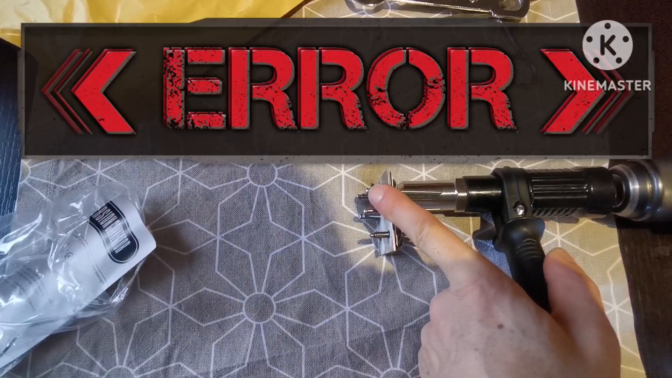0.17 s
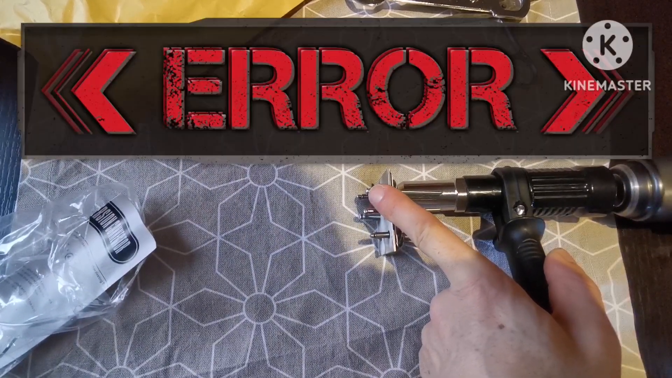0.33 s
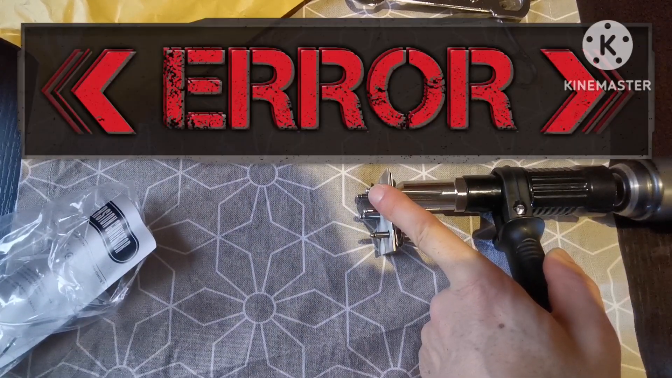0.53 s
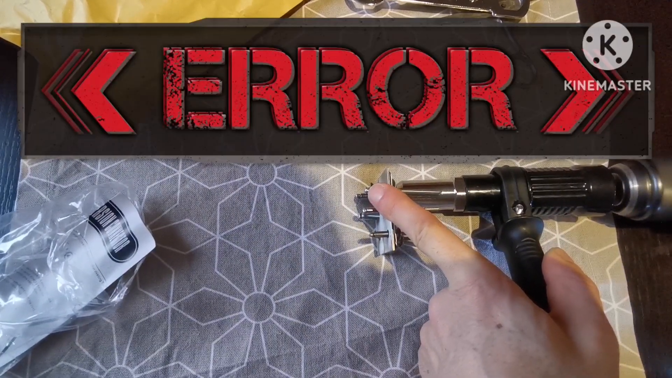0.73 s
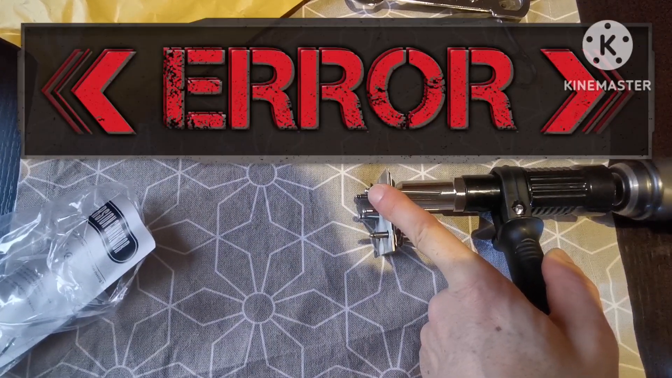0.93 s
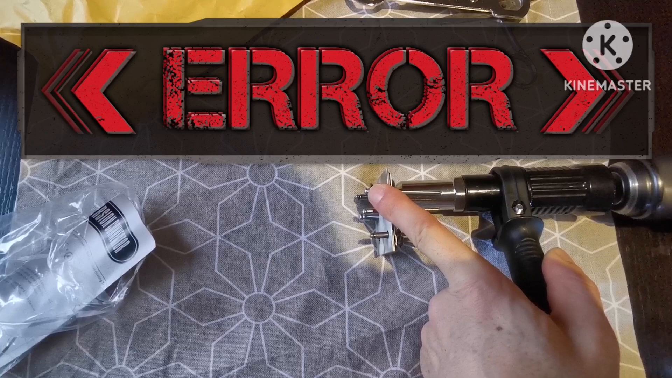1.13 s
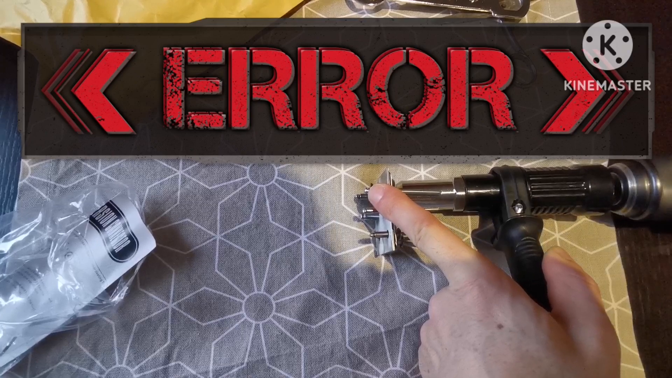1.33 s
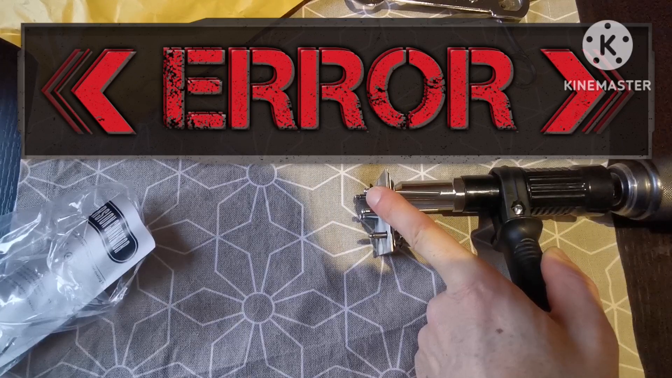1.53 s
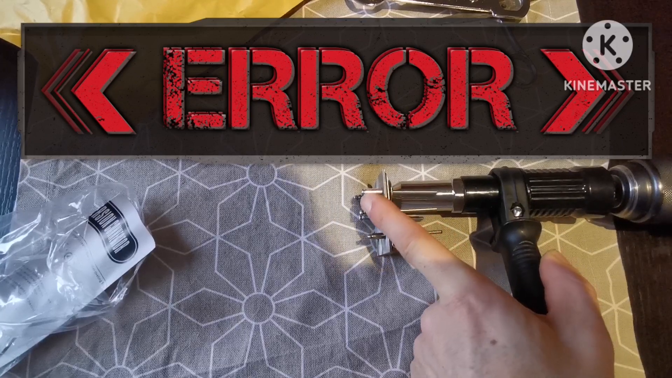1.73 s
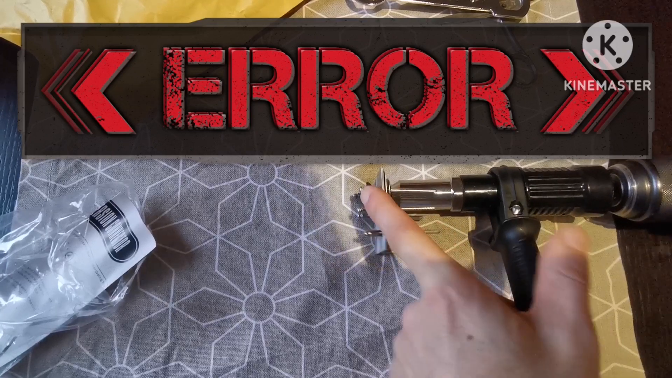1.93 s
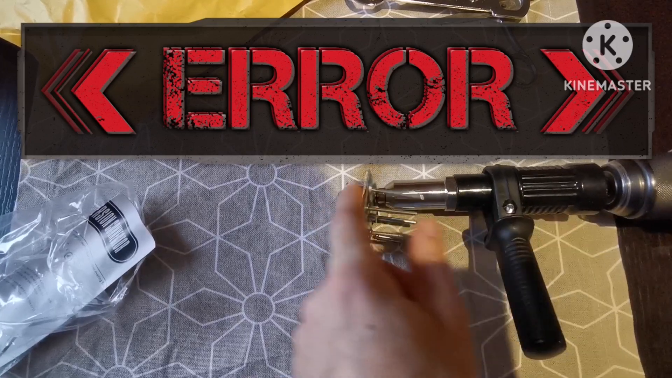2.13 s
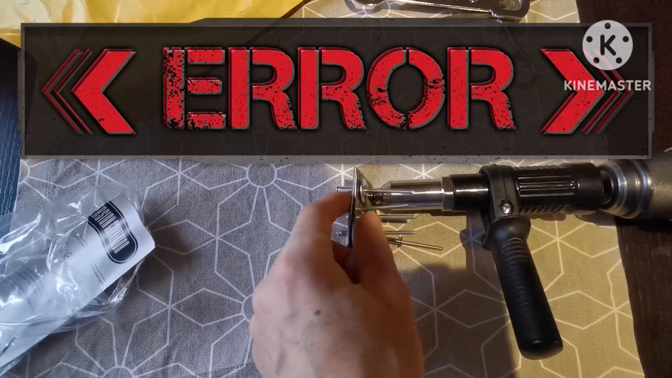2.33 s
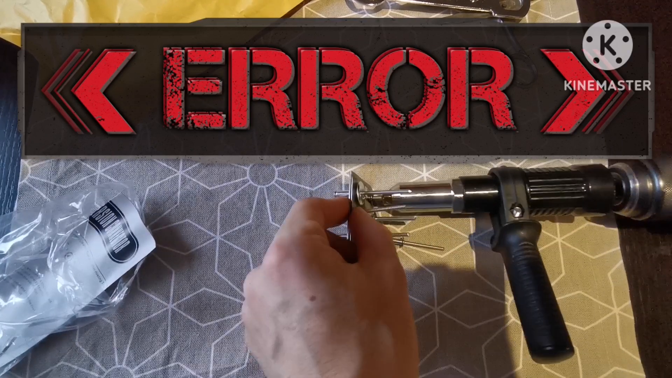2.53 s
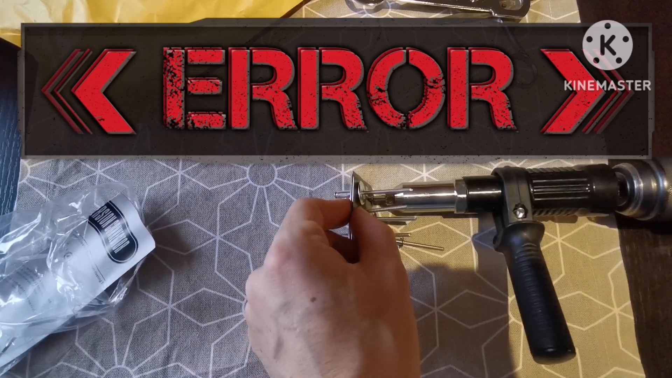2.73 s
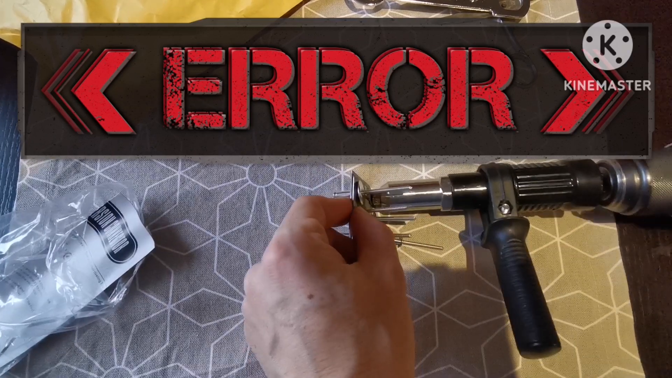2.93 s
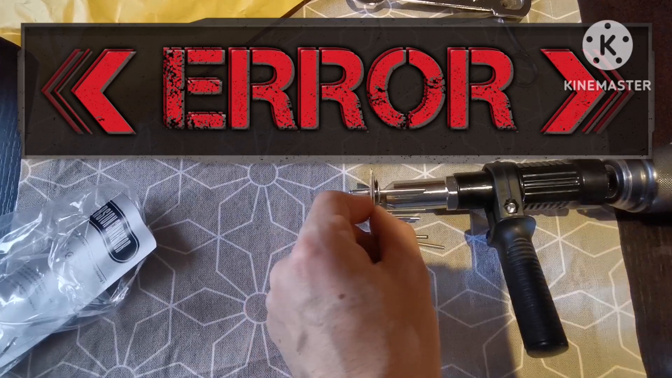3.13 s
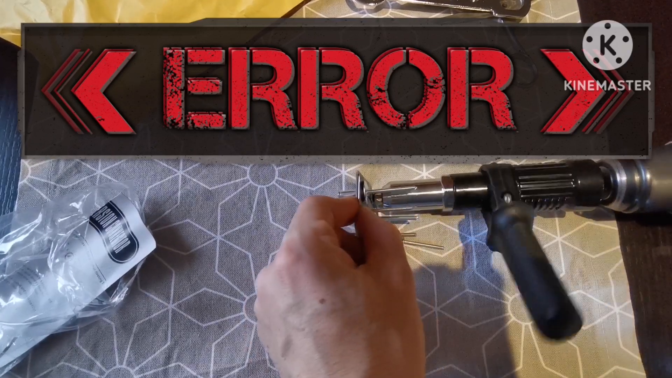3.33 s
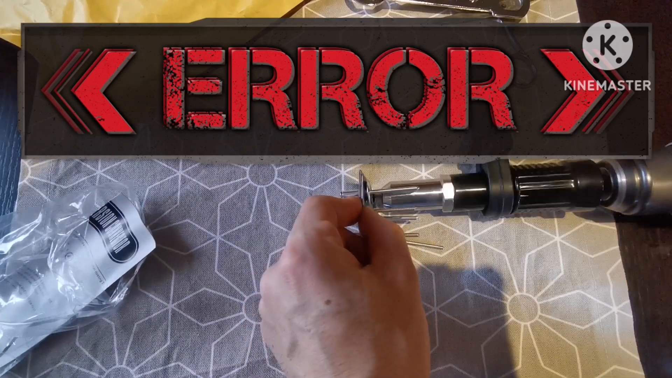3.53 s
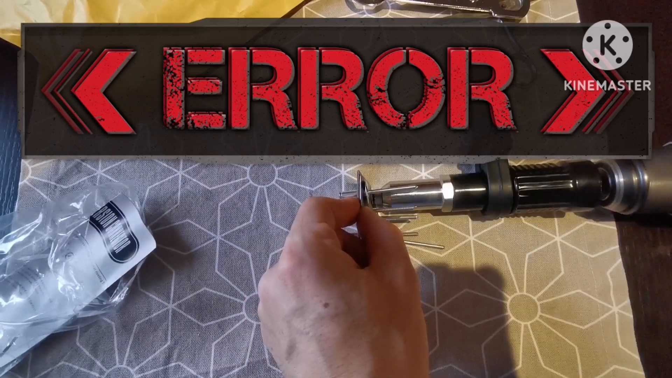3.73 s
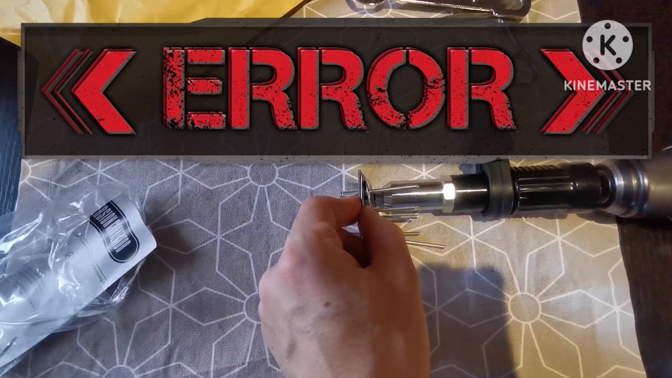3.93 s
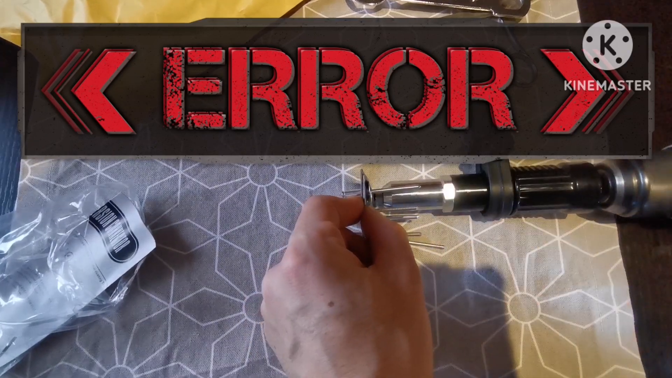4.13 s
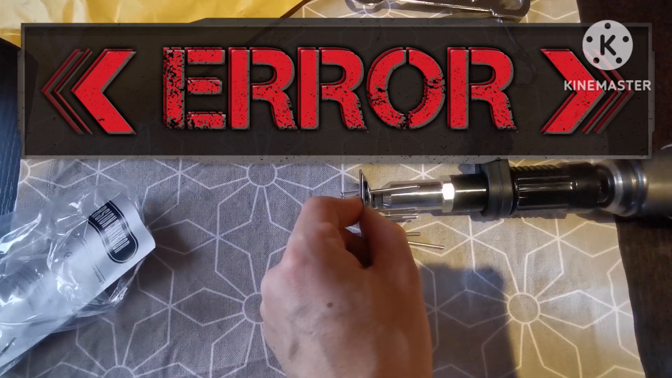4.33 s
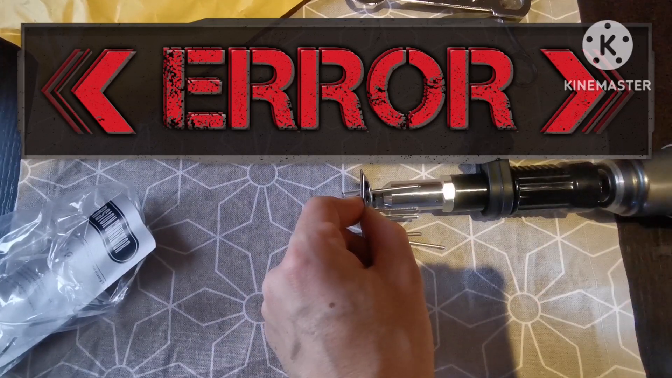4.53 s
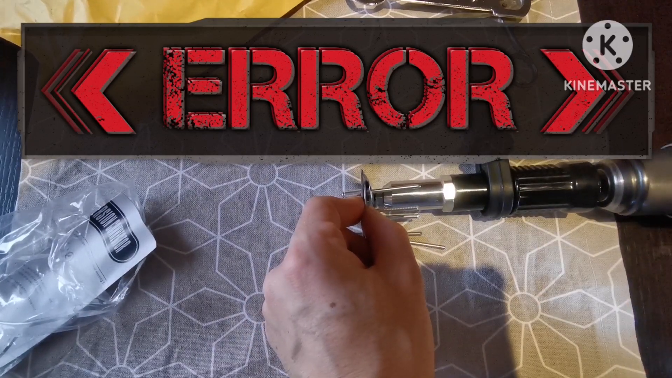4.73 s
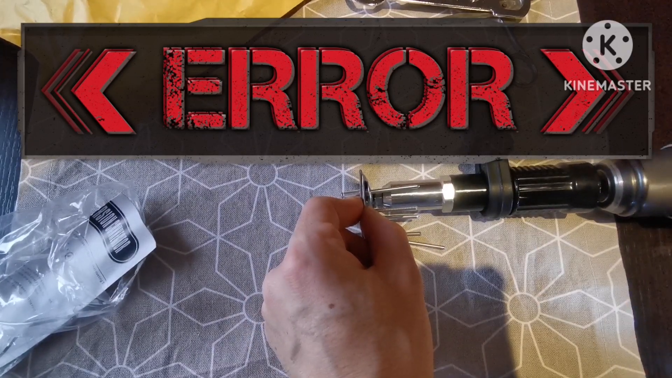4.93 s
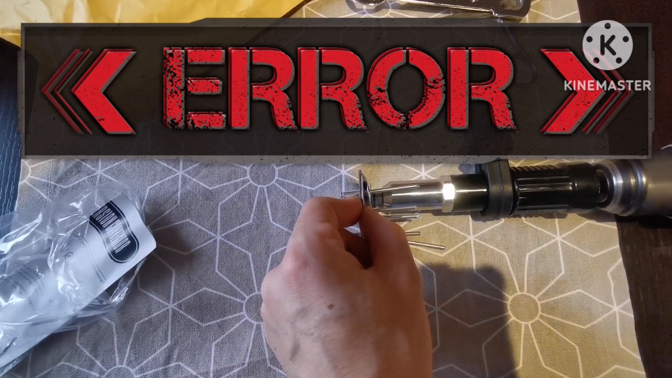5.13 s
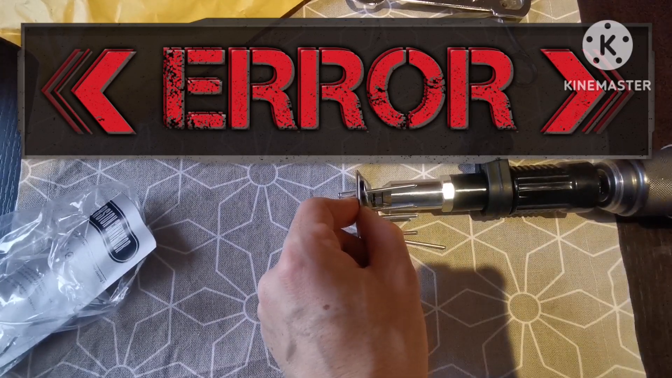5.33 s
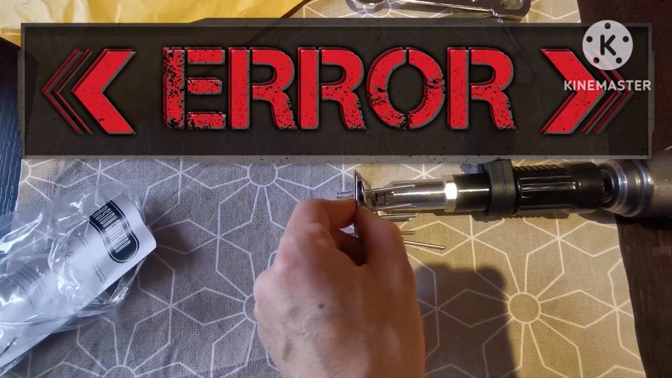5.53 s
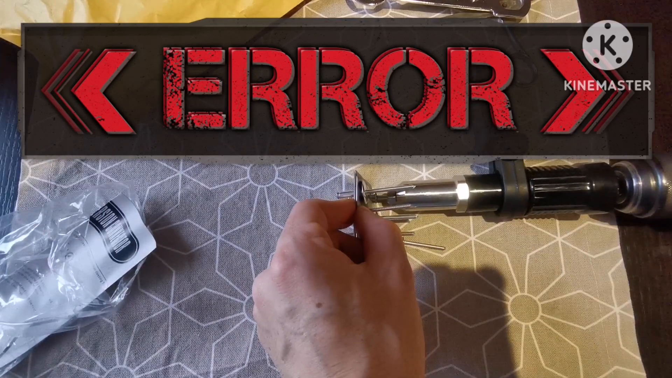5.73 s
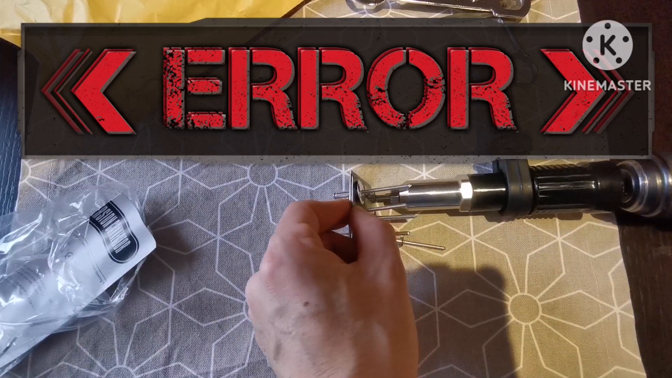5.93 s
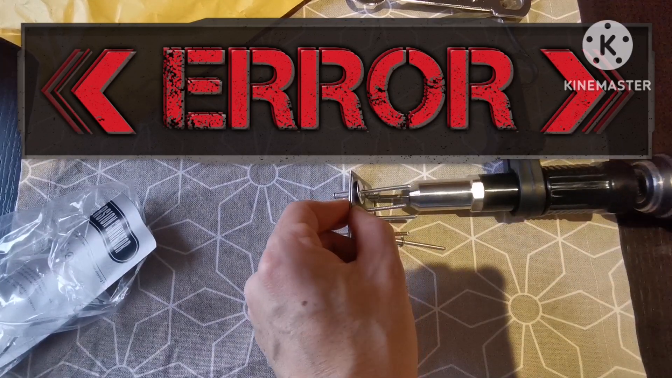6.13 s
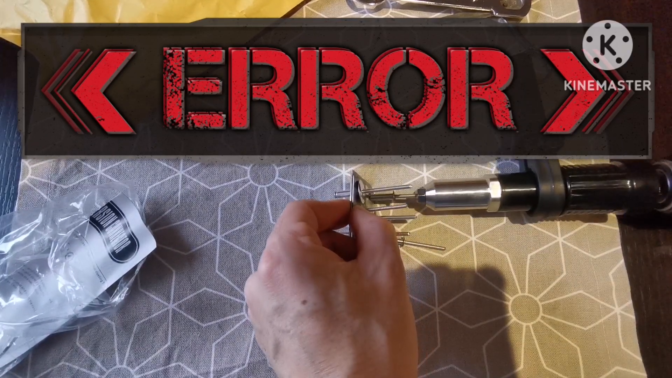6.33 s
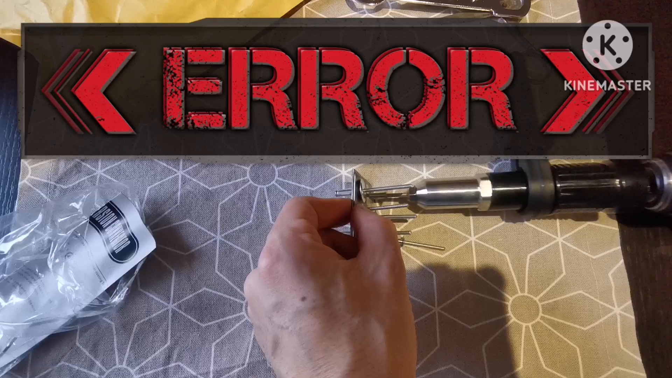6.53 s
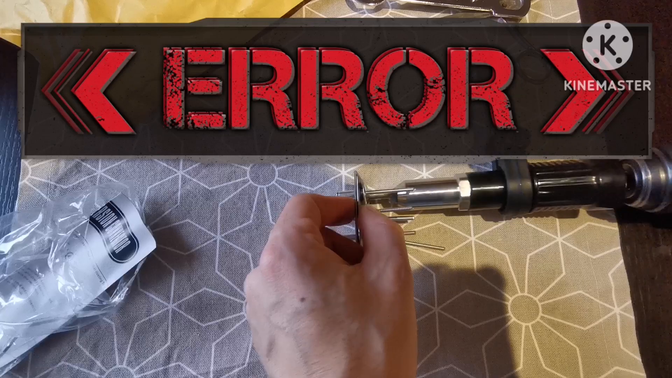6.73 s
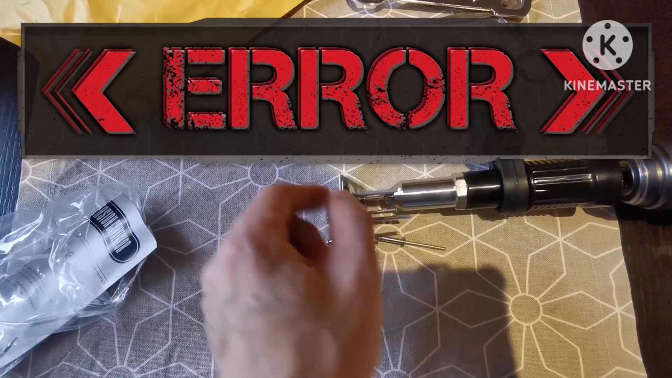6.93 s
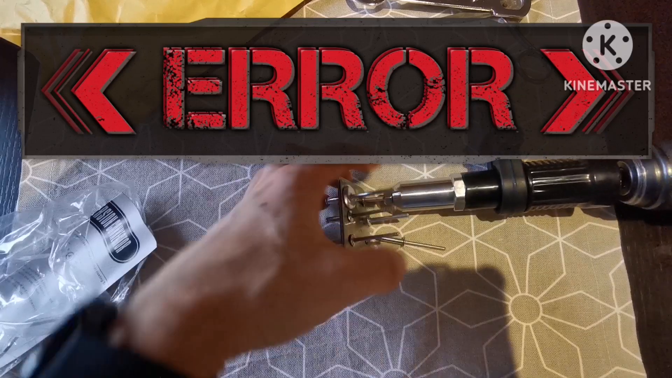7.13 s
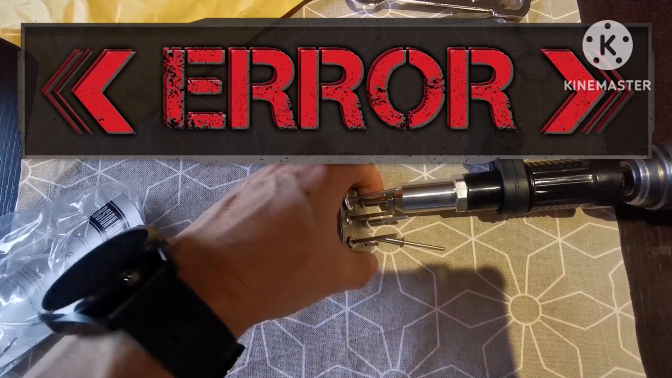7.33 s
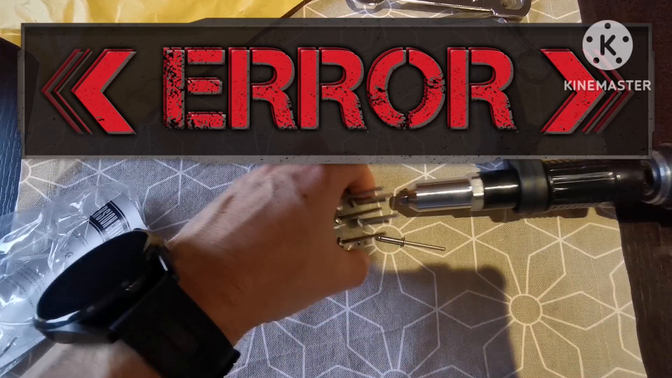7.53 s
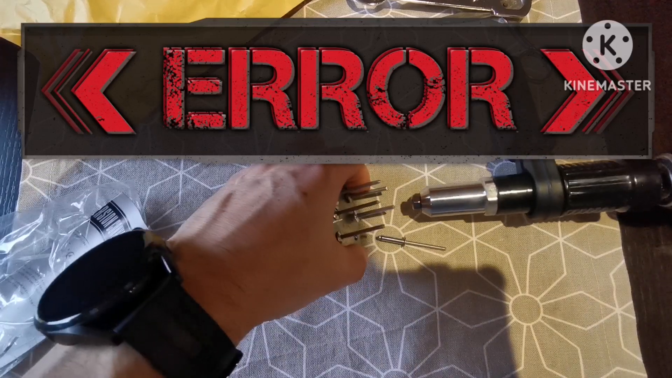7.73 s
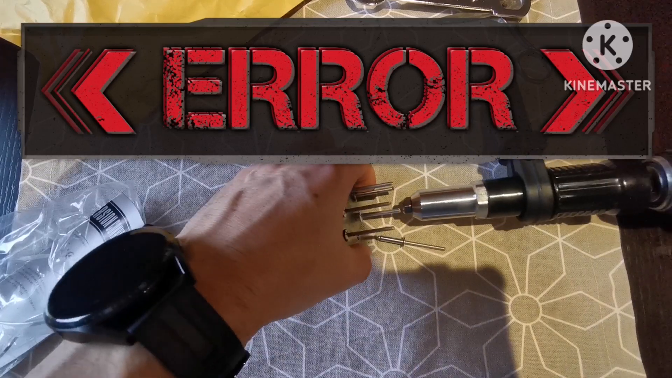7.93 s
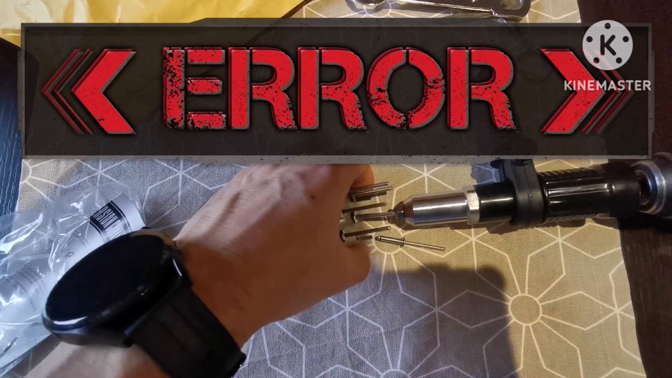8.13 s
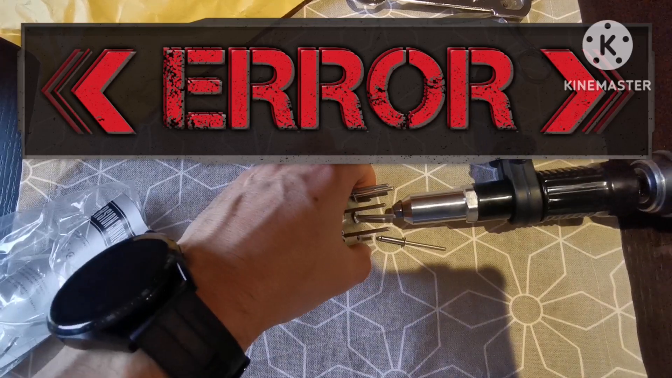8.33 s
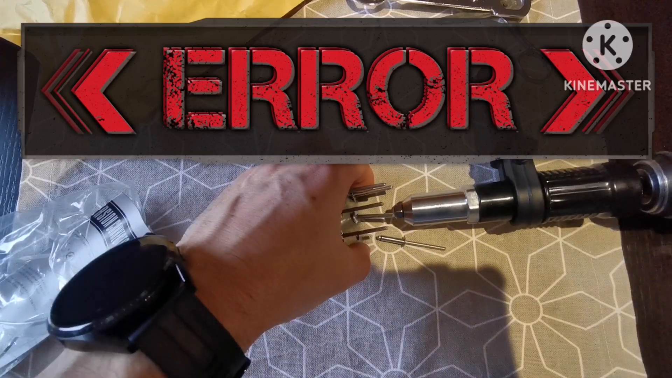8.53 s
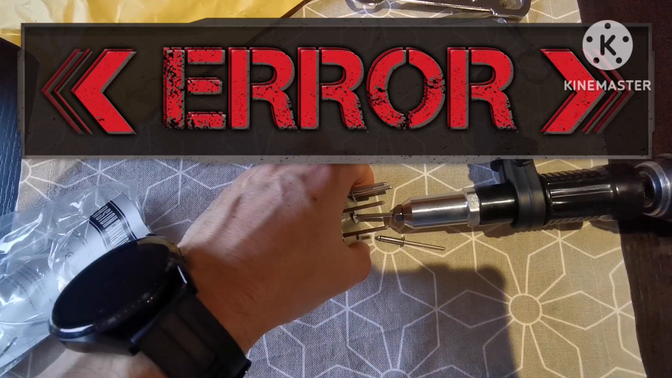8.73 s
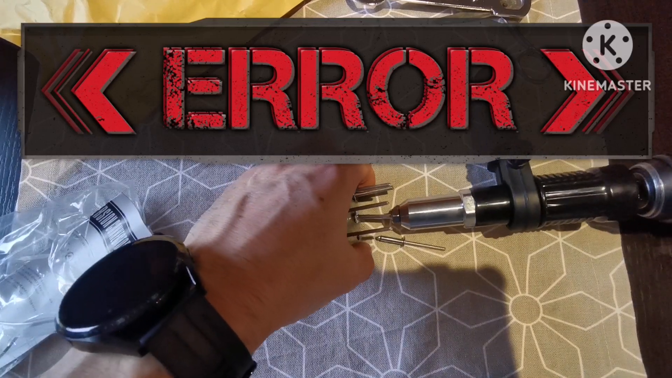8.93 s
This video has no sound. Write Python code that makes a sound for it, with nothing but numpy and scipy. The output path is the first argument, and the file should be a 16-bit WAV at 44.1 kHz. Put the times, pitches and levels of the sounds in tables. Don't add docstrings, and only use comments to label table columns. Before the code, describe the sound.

Close stereo pickup at a cloth-covered table in a small quiet room. A cordless drill already runs up to full speed, whirring and whining with fast regular clacks, then brakes. Fingers rub cloth and tick thin steel parts. A weak second burst ends around one loud wooden knock, a third climbs steadily and stops abruptly with a ringing brake. Afterwards only sparse light metal clicks and soft rubbing remain.

```python
import sys
import numpy as np
from scipy import signal
from scipy.fft import rfft, irfft, next_fast_len
from scipy.io import wavfile
from scipy.ndimage import uniform_filter1d

SR = 44100
rng = np.random.default_rng(int(sys.argv[2]) if len(sys.argv) > 2 else 0)


def invert_db(level):
    return 10 ** (np.asarray(level, dtype=float) / 20)


def pcm_store(signal):
    levels = np.round(np.clip(np.atleast_2d(signal), -1, 1) * 32767)
    wavfile.write(sys.argv[1], SR, levels.astype(np.int16).T)


N = 400428
LAG = 16

# let go in seconds, whirr in dB, table rumble in dB, deep shake in dB.
PULLS = [
    (1.402, -34.5, -36.5, -60),
    (3.87, -38, -46.5, -58.5),
    (5.275, -36, -44, -50),
]
RUN_PANS_DB = [-0.5, -5.5, -5]


def evened(x):
    return x / np.sqrt(np.mean(x ** 2) + 1e-20)


def read(points, hz):
    f, value = np.transpose(points)
    return np.interp(np.log(hz + 1), np.log(f + 1), value)


def colour(x, points):
    size = next_fast_len(x.shape[-1] + 2048)
    gain = invert_db(read(points, np.fft.rfftfreq(size, 1 / SR)))
    return irfft(rfft(x, size) * gain, size)[..., :x.shape[-1]]


def curves(rows):
    s, *columns = np.transpose(rows)
    t = np.arange(s[0], s[-1], 1 / SR)
    return s[0], t, [np.interp(t, s, c) for c in columns]


def add(mix, s, sound, pan_db=0., lag=0):
    for side, late, sign in zip(mix, (lag, 0), (.5, -.5)):
        part = side[round(s * SR) + late:][:len(sound)]
        part += (sound * invert_db(sign * pan_db))[:len(part)]


def drift(size, span):
    return evened(uniform_filter1d(uniform_filter1d(rng.standard_normal(size), span), span))


def ring(modes, t):
    return sum(invert_db(db - 60 * t / t60) * np.sin(2 * np.pi * hz * t) for hz, db, t60 in modes)


def table_top(x):
    # frequency in Hz, width in Hz, level in dB.
    board_modes = [(61, 30, -15), (139, 49, -12.5), (210, 29, -4), (267.4, 30, 0.9), (332, 50, -2),
                   (410, 63, -4.5), (526.3, 40, -5), (763, 73, -9)]
    t = np.arange(6000) / SR
    answer = ring([(hz, db, 2.2 / width) for hz, width, db in board_modes], t)
    return signal.oaconvolve(x, answer)[:len(x)]


def deep(size):
    shake = colour(rng.standard_normal(size), [(30, -13.5), (60, 5.5), (110, -5.5), (170, -34.0)])
    return evened(shake) * invert_db(0.83 * drift(size, 1200))


def rattle(size, cycles, spread_db, hz):
    t = np.arange(size) / SR
    starts = np.r_[0, rng.uniform(0, cycles / hz, 3)][:, None]
    levels = invert_db(-spread_db * np.r_[0, rng.random(3)])[:, None]
    puffs = (t >= starts) * np.exp(-hz * abs(t - starts)) * levels
    return puffs.sum(0) * rng.standard_normal(size)


def air():
    # frequency in Hz, level in dB.
    air_spectrum = [(15, -28.5), (25, 4), (49, -8), (85, -13.5), (160, -10), (280, -13.5), (496, -14.5),
                    (1030, -22.5), (1600, -27.5), (2530, -26), (6730, -36.5), (7710, -43), (11000, -34.5),
                    (15200, -40.5), (16500, -49.5)]
    common, own = rng.standard_normal(N), rng.standard_normal((2, N))
    mixed = colour(common, [(350, 0), (900, -30)]) + colour(own, [(250, -18), (700, 0)])
    return invert_db(-67) * evened(colour(mixed, air_spectrum))


def chopper(mix):
    # on in seconds, trigger further in at seconds, off in seconds, level in dB, level after in dB.
    pulses = [
        (-.05, .2, 1.32, -37.5, -50),
        (3.243, 3.55, 3.86, -41, -47.5),
        (4.025, 5.13, 5.27, -45, -48.5),
    ]
    # multiple of the switching rate, level in dB.
    overtones = [(2, 4), (3, -2), (4, 0)]
    switch_hz = 3894
    onset_db, onset_s, ease_s = -27, 0.034, 0.03
    overtone_base_db, stall_db, stall_s = -67.5, 13, 0.037
    for on, ease, off, db, after_db in pulses:
        t = np.arange(max(on, 0), off + .06, 1 / SR)
        gate_db = onset_db * np.exp(-(t - on) / onset_s) - 500 * np.maximum(t - off, 0)
        level_db = db + gate_db + (after_db - db) * (.5 + .5 * np.tanh((t - ease) / ease_s))
        overtone_db = overtone_base_db + gate_db + stall_db / (1 + ((t - on) / stall_s) ** 2)
        phase = 2 * np.pi * np.cumsum(switch_hz * (1 + 0.0002 * drift(len(t), 2000))) / SR
        tone = invert_db(level_db + 5.0 + 1.8 * drift(len(t), 600)) * np.sin(phase)
        upper = sum(invert_db(k_db + 3 * drift(len(t), 500)) * np.sin(k * phase) for k, k_db in overtones)
        add(mix, t[0], tone + invert_db(overtone_db + 3) * upper, lag=LAG - 4)


def motor(rows):
    s, t, (hz,) = curves(rows)
    return s, t, uniform_filter1d(hz, size=1500)


def efforts(t, mesh_hz, pull, start_db, stop_db_per_s, tire_db_per_s, deep_build):
    # frequency in Hz, level in dB.
    mesh_answer = [(150, -85), (450, -62.5), (600, -61), (740, -42.5), (860, -39), (1050, -43.5),
                   (1120, -52), (1230, -59.5)]
    let_go, whirr_db, rumble_db, deep_db = pull
    age, after = t - t[0], np.maximum(t - let_go, 0)
    hz_per_s = np.gradient(mesh_hz) * SR
    bite = start_db * np.exp(-age / 0.028) - stop_db_per_s * after
    build = -24 * np.exp(-age / .25)
    board = -152.5 * after - tire_db_per_s * age
    torque = np.tanh(uniform_filter1d(hz_per_s, size=2000) / 3500)
    coast = -22 * np.maximum(-torque, 0)
    rush = -4 * (hz_per_s > 2800)
    whirr_db = whirr_db + bite + 1.5 * np.log2(mesh_hz / 1000)
    mesh_db = read(mesh_answer, mesh_hz) + coast + rush
    pinion_db = bite + .5 * coast + 7 * torque + 6 * np.minimum(np.log2(mesh_hz / 550), 0)
    return whirr_db, rumble_db + build + board, deep_db + deep_build * build + board, mesh_db, pinion_db


def drill(mix, tones):
    # time in seconds, gear mesh rate in Hz.
    speed_tracks = [
        [(0, 148.7), (.1, 450), (.205, 905), (.3, 1119.4), (.45, 1198.8), (.75, 1220.2), (1.26, 1228.6),
         (1.4, 913.4), (1.6, 134)],
        [(3.3, 40), (3.375, 210), (3.45, 315), (3.58, 578), (3.645, 655), (3.665, 540), (3.74, 712),
         (3.82, 748), (4, 420)],
        [(4.05, 147.8), (4.23, 500), (4.4, 733), (4.55, 865.6), (4.75, 972.2), (5.0, 1035.8), (5.25, 1044.9),
         (5.31, 773.2), (5.44, 247.8)],
    ]
    # whirr at the first moment in dB, stop in dB/s, tiring in dB/s, share of build-up in the
    # deep shake, pinion level in dB.
    starts_db, stops_db_per_s, tires_db_per_s = [-25, -31.5, -69], [204, 288.5, 282], [2, -0.5, 3]
    deep_builds, pinions_db = [.1, .7, 0.99], [-48, -50, -48.5]
    shaft_orders = [8, 9, 10, 14.46, 17, 18, 19, 26, 27, 28.92, 5.82]
    orders_db = [-6, 2, -4, -1, -8, 1.5, -8, -8, -6, -8, -7]
    # frequency in Hz, width in Hz, lift in dB.
    housing = [(1200, 400, 3), (1750, 250, -8), (2380, 260, 3), (2950, 250, -4), (3400, 200, -4),
               (4400, 450, 4), (5500, 550, 6), (6800, 400, 5)]
    # frequency in Hz, level in dB per Hz.
    whirr_spectrum = [(180, -28.5), (300, -3), (694, -5.5), (1070, -1), (1770, -9), (2440, 0.5), (3360, -7),
                      (3770, -3.5), (4610, -3.5), (7380, -5.5), (8300, -12.5), (12800, -8.5),
                      (15700, -14.5), (16500, -42)]
    shaft_per_mesh = .2075
    ticks_per_turn, tick_db, tick_below_hz = 4.82, 10., 210
    settings = zip(speed_tracks, PULLS, starts_db, stops_db_per_s, tires_db_per_s, deep_builds,
                   pinions_db, RUN_PANS_DB)
    for speeds, pull, start_db, stop, tire, deep_build, teeth_db, pan_db in settings:
        s, t, mesh_hz = motor(speeds)
        whirr_db, rumble_db, deep_db, mesh_db, pinion_db = efforts(
            t, mesh_hz, pull, start_db, stop, tire, deep_build)
        size, edge = len(t), signal.windows.tukey(len(t), .02)
        turns = np.cumsum(mesh_hz * shaft_per_mesh * (1 + .0015 * drift(size, 400))) / SR

        lines = invert_db(mesh_db + 5.5 + 1.5 * drift(size, 700)) * np.sin(2 * np.pi * turns / shaft_per_mesh)
        for k, db in zip(shaft_orders, orders_db):
            hz = k * shaft_per_mesh * mesh_hz
            lift = sum(invert_db(g) / (1 + ((hz - f) / w) ** 4) for f, w, g in housing) + 0.098
            line = np.sin(2 * np.pi * (k * turns + rng.random()))
            lines += lift * invert_db(teeth_db + pinion_db + db + 2.5 * drift(size, 700)) * line

        ticks_db = (tick_db / (1 + (mesh_hz / tick_below_hz) ** 4)
                    * (np.cos(2 * np.pi * ticks_per_turn * turns) - .5))
        uneven_db = 2.3 * drift(size, 25) + 1.2 * drift(size, 400)
        chatter = invert_db(uneven_db + 1.5 * np.cos(2 * np.pi * turns) + ticks_db)
        whirr = evened(colour(chatter * rng.standard_normal((3, size)), whirr_spectrum))
        fizz = colour(whirr, [(6800, -60), (8000, 0)])
        fizz_gain = invert_db(3 * np.log2(mesh_hz / 1100))
        shared, left, right = (whirr - fizz + fizz * fizz_gain) * invert_db(whirr_db) * edge
        add(mix, s, shared * 0.47, pan_db, lag=LAG)
        add(tones, s, lines * edge, pan_db, lag=LAG)
        add(mix[:1], s, left * 1.03, pan_db)
        add(mix[1:], s, right * 0.91, -pan_db)

        hum = colour(table_top(chatter * rng.standard_normal(size)), [(45, -13), (140, -10), (250, 1.5)])
        board = evened(hum) * invert_db(rumble_db) + deep(size) * invert_db(deep_db)
        wobble_db = rumble_db - 4 + 10.0 * np.log2(mesh_hz / mesh_hz.max()) + 1.1 * drift(size, 500)
        board += invert_db(wobble_db) * np.sin(2 * np.pi * turns)
        add(mix, s, board * edge, pan_db + 3.5, lag=LAG // 3)


def turns_of_adapter():
    # time in seconds, peak in dB, table thump in dB, steel ring in dB.
    jolts = [
        (3.5409, -19, -44.5, -31.5),
        (3.6524, -17, -19.5, -50.5),
        (3.7137, -28, -33, -48),
        (3.8238, -20.5, -32, -38),
        (3.923, -34.5, -39.5, -67.5),
        (4.1729, -17, -45.5, -53),
        (5.3235, -20, -35.5, -36),
        (5.332, -21.5, -55, -68.5),
    ]
    # time in seconds, clack, thump and ring in dB.
    first_turns = [(0.1879, -19.5, -31, -46), (0.2705, -20, -31.5, -46.5), (0.3414, -22, -39.5, -50),
                   (0.4107, -17.5, -45.5, -42.5), (0.477, -21.5, -32, -40.5), (0.5436, -22.5, -33, -45),
                   (0.6098, -22.5, -34.5, -49), (0.674, -22.5, -38, -42), (0.7405, -20, -33.5, -43),
                   (0.8052, -22.5, -31.5, -42), (0.8702, -22, -35.5, -39), (0.9364, -24, -32, -36),
                   (1.0011, -26, -32, -36), (1.0648, -19.5, -28, -41.5), (1.131, -22, -29.5, -36.5),
                   (1.194, -21, -29.5, -45), (1.26, -17, -29.5, -39.5), (1.3302, -21.5, -30.5, -37.5),
                   (1.4115, -23, -35, -38.5)]
    last_turns = [(4.323, -24, -41, -31), (4.4349, -19.5, -42.5, -31.5), (4.534, -19.5, -37.5, -40.5),
                  (4.6216, -19, -39.5, -40), (4.7096, -19.5, -44, -43.5), (4.7919, -18.5, -38, -33),
                  (4.8723, -23, -37.5, -29.5), (4.9512, -17.5, -37.5, -34.5), (5.0287, -21.5, -43, -32.5),
                  (5.104, -21.5, -41, -30.5), (5.1813, -23, -45.5, -32.5), (5.257, -21, -39, -36)]
    # seconds (zero), then clack, thump and ring in dB.
    peak_over = [0, 3, 10, 8]
    echo_s, echo_db, echo_from_s = .0455, -7, 4.68
    rows = np.array(first_turns + last_turns) + peak_over
    fast = rows[(rows[:, 0] > echo_from_s) & (rows[:, 0] + echo_s < PULLS[2][0])]
    return [*jolts, *rows, *(fast + [echo_s, echo_db, -6, -14])]


def clacks(mix, tones):
    # frequency in Hz, level in dB.
    clack_spectrum = [(700, -4.5), (1500, -1), (2500, -0.5), (4500, -2.5), (7500, -6.5), (10000, -9),
                      (13000, -14.5), (16000, -9.5)]
    # frequency in Hz, level in dB, t60 in seconds.
    steel = [(7510, 0, .09), (9200, -5, .05), (5680, -12, .03)]
    t = np.arange(3200) / SR
    held = np.minimum(t / 0.0019, 1) / (1 + (t / .0095) ** 6)
    for s, db, thump_db, ring_db in turns_of_adapter():
        pan_db = RUN_PANS_DB[0 if s < 2 else 2]
        start_s = s - .0006
        length_s = .0012 * rng.uniform(.85, 1.25)
        burst = (t / length_s) * np.exp(-t / length_s) * invert_db(2.5 * drift(len(t), 12))
        shared, left, right, push = burst * rng.standard_normal((4, len(t)))
        clack = colour(shared, clack_spectrum)
        gain = invert_db(db + 2.5) / abs(clack).max()
        add(mix, start_s, gain * clack, pan_db, lag=LAG)
        add(tones, start_s, invert_db(ring_db + 0.5) * ring(steel, t) * held, pan_db, lag=LAG)
        add(mix[:1], start_s, .9 * gain * colour(left, clack_spectrum), pan_db, lag=LAG)
        add(mix[1:], start_s, .9 * gain * colour(right, clack_spectrum), -pan_db)
        thump = colour(table_top(push), [(100, -14.5), (260, -1.0), (900, 6.5)]) * invert_db(-60 * t / 0.059)
        add(mix, s, invert_db(thump_db - 1.0) * thump / abs(thump).max(), pan_db + 1.5, lag=LAG // 3)


def brake(mix):
    # time in seconds, level in dB, frequency in Hz, t60 in seconds.
    songs = [
        (1.412, -42.5, 2310, 0.34),
        (5.324, -34, 4330, 0.24),
    ]
    t = np.arange(12000) / SR
    for s, db, hz, t60 in songs:
        band = [(hz * .6, -30), (hz * .88, -3), (hz * 1.12, -3), (hz * 1.5, -30)]
        song = evened(colour(rng.standard_normal(len(t)), band))
        add(mix, s, invert_db(db - 60 * t / t60) * song, -4., lag=LAG)


def hands(mix):
    # time in seconds, half length in seconds, rub in dB, deep shake in dB.
    moves = [(1.52, 0.2, -73.5, -76.5), (2.074, 0.067, -75, -77), (2.398, 0.36, -71, -72.5),
             (2.691, 0.065, -53.5, -70.5), (3.056, 0.11, -62, -75), (3.34, 0.44, -60, -84),
             (5.399, .15, -64, -72), (5.7, .08, -65.5, -76), (5.86, 0.15, -60.5, -84),
             (6.05, .05, -62.5, -82), (6.235, 0.14, -65, -71.5), (6.637, 0.081, -63.5, -66),
             (7.444, 0.17, -64.5, -72), (7.69, 0.073, -63.5, -63.5), (8.2, 0.044, -62.5, -83),
             (8.869, 0.066, -72, -75), (9.08, 0.068, -63.5, -72.5)]
    # start in seconds, length in seconds, level in dB, loudest Hz.
    scrapes = [(2.07, 0.061, -66.5, 9150), (2.594, 0.05, -73, 2960), (2.907, 0.084, -62.5, 2900),
               (2.936, 0.088, -63.5, 5300), (5.771, 0.036, -71.5, 4560), (6.26, 0.2, -71.5, 7360),
               (6.633, 0.16, -76, 7970), (7.419, 0.054, -63.5, 8900), (7.582, 0.11, -60.5, 9500),
               (8.189, 0.047, -54.5, 1520), (8.47, 0.071, -73, 10100), (8.698, 0.1, -75.5, 2750)]
    # time in seconds, level in dB.
    hum_track = [(1.5, -70.5), (1.9, -70.5), (2.03, -76), (2.17, -62.5), (2.33, -75), (2.42, -58.5),
                 (2.62, -61), (2.95, -71), (3.2, -71)]
    hum_hz, rest_db, rest_deep_db = 153, -80, -82
    at, half, rub_db, deep_db = np.transpose(moves)[:, :, None]
    swell = invert_db(-10 * abs(np.arange(0, N, 100) / SR - at) / half)
    rub = invert_db(rest_db) + (invert_db(rub_db) * swell).max(0)
    shake = invert_db(rest_deep_db) + (invert_db(deep_db) * swell).max(0)
    rub, shake = np.repeat([rub, shake], 100, axis=1)[:, :N]
    skin = evened(colour(table_top(rng.standard_normal(N)), [(70, -16), (180, 1.0), (330, -1.0), (650, -4.5)]))
    add(mix, 0, rub * invert_db(1.0 * drift(N, 900)) * skin + shake * deep(N), 3.)
    for s, length_s, db, hz in scrapes:
        size = round(length_s * SR)
        spectrum = [(hz * .2, -24), (hz * .7, -7), (hz, 0), (hz * 1.4, -7), (hz * 2.7, -18)]
        for side, pan_db in zip(mix[:, None], (-5., 5.)):
            grit = invert_db(5.6 * drift(size, 30)) * rng.standard_normal(size)
            band = evened(colour(grit, spectrum))
            add(side, s, invert_db(db) * band * signal.windows.tukey(size, .7), pan_db)
    s, t, (db,) = curves(hum_track)
    add(mix, s, invert_db(db + 1.0 + 1.3 * drift(len(t), 1500)) * np.sin(2 * np.pi * hum_hz * t))


def parts(mix):
    # time in seconds, peak in dB, loudest Hz, level below 2.5 kHz in dB.
    touches = [(2.079, -51.5, 7300, -74), (2.103, -55, 8040, -82), (2.3008, -35.5, 9400, -79),
               (1.8, -57, 6960, -83), (2.388, -60, 5800, -75), (2.506, -55, 6700, -80),
               (3.008, -40, 13000, -60), (3.015, -27.5, 4600, -53), (6.827, -44.5, 10800, -64),
               (7.441, -50, 12100, -75), (7.458, -53, 13200, -75), (7.626, -43, 13120, -76),
               (7.653, -43, 12230, -66.5), (9.042, -44.5, 6800, -75), (2.4804, -55, 6190, -84),
               (2.5135, -34.5, 6460, -71), (2.522, -66, 2350, -46), (2.355, -72, 2300, -67),
               (2.61, -56, 5030, -64), (2.641, -72, 2200, -59), (2.709, -51, 12600, -70),
               (2.6982, -35, 12340, -60), (3.0003, -22.5, 10600, -41.5), (3.1583, -48, 2768, -54),
               (3.24, -36, 4200, -51), (6.3866, -52, 12700, -60.5), (6.4428, -46, 6700, -80.5),
               (6.671, -64, 1300, -55.5), (6.782, -25, 10600, -69), (6.798, -46, 9320, -78),
               (7.0618, -29.5, 9500, -66), (7.0456, -29.5, 9650, -54), (7.0564, -15.5, 13800, -51),
               (7.238, -68, 5000, -73), (7.2831, -51, 14330, -76), (7.321, -52, 13060, -78),
               (7.333, -46, 6280, -65), (7.416, -52, 4740, -76), (7.4325, -35, 11940, -59.5),
               (7.448, -35, 12900, -60), (7.611, -43, 12300, -77.5), (7.6386, -41.5, 13660, -70),
               (8.099, -47, 6780, -57), (8.187, -37.5, 11300, -51), (8.828, -45, 2744, -81),
               (8.8698, -42.5, 12100, -68.5), (9.037, -42.5, 2580, -71)]
    # time in seconds, peak in dB, brightness in dB.
    bumps = [(2.015, -54.5, -27.5), (2.057, -48.5, -33), (2.157, -40.5, -13), (2.627, -37, -18),
             (2.693, -39.5, -10.5), (2.948, -46.5, 4), (3.0004, -35.5, -5), (3.0145, -33, 2.5),
             (3.041, -43, 4), (6.668, -44.5, -13.5), (8.826, -52.5, -38), (9.033, -44.5, -29)]
    pin_modes_hz = [4700, 6700, 9300, 10800, 12200, 14400]
    t = np.arange(3000) / SR
    for s, db, hz, low_db in touches:
        plate_db = -23 + .72 * db
        pan_db = -15.5 - 4.5 * np.log2(hz / 8000)
        hit = colour(rattle(len(t), 4., 22., hz=1300.),
                     [(hz * .35, -34), (hz * .65, -11), (hz, 0), (hz * 1.2, -9), (hz * 2.2, -22)])
        modes = [(f, -4 - 12 * abs(np.log2(f / hz)) - 8 * rng.random(), .022) for f in pin_modes_hz]
        pins = ring([(hz, -2, .012)] + modes, t)
        low = colour(rattle(len(t), 3., 20., hz=700.),
                     [(500, -26), (1000, -6), (2200, 1.5), (3300, -9), (6000, -36)])
        plate = colour(rattle(len(t), 3., 20., hz=1000.),
                       [(2200, -26), (3600, -9), (5200, 2), (6800, -3), (9500, -22)])
        body = invert_db(low_db + 2.0) * low / abs(low).max() + invert_db(plate_db + 2.0) * plate / abs(plate).max()
        add(mix, s, invert_db(db - 4.0) * (hit / abs(hit).max() + .26 * pins) + body, pan_db, lag=-4)
    for s, db, bright_db in bumps:
        push = rattle(6000, 3., 24., hz=110.)
        bump = colour(table_top(push), [(60, -12.0), (150, 0.0), (300, 3.0), (550, .5 * bright_db + 6.5),
                                        (1000, bright_db + 8.5)])
        add(mix, s, invert_db(db - 0.5) * bump / abs(bump).max(), 2.5)


def knock(mix):
    # frequency in Hz, level in dB, t60 in seconds.
    knock_modes = [(205, 0, 0.16), (260, 3, 0.1), (961, -2.5, 0.032), (1236, -2.5, 0.047),
                   (1860, -4, 0.037), (2400, 11, 0.01)]
    knock_s, knock_db, rise_s = 3.65, -1.9, .0025
    t = np.arange(9000) / SR
    push = -1.17 * np.exp(-((t - .0007) / 0.00009) ** 2) + 0.16 * np.exp(-((t - .0022) / 0.00033) ** 2)
    shake = colour(rng.standard_normal(len(t)), [(100, -10.0), (250, 0.0), (600, -10.0), (1000, 3.5),
                                                 (2200, 1.5), (3000, -18.0), (9000, -41.5)])
    tail = 0.14 * evened(shake) * invert_db(-60 * t / 0.26) * np.minimum(t / rise_s, 1)
    add(mix, knock_s, invert_db(knock_db) * (push + 0.087 * ring(knock_modes, t) + tail), 4.5, lag=4)


def room(x):
    # frequency in Hz, t60 in seconds.
    decay = [(100, 0.38), (400, .33), (1500, 0.34), (4000, 0.31), (9000, 0.25), (16000, 0.18)]
    taps = np.zeros((2, SR // 2))
    at = np.arange(120, SR // 2 - 20, 20) + rng.integers(0, 20, (2, (SR // 2 - 121) // 20))
    np.put_along_axis(taps, at, rng.choice([-1., 1.], at.shape), 1)
    hz, t, z = signal.stft(taps, SR, nperseg=256)
    tail = signal.istft(z * invert_db(-60 * t / read(decay, hz)[:, None]), SR, nperseg=256)[1]
    tail[1] += colour(tail[0] - tail[1], [(350, 0), (700, -30)])
    return signal.fftconvolve(x[None], tail / np.linalg.norm(tail[0]), axes=1)[:, :N]


def scene():
    tool, tones, touch, rub = np.zeros((4, 2, N))
    chopper(tones)
    drill(tool, tones)
    clacks(tool, tones)
    brake(tool)
    hands(rub)
    parts(touch)
    knock(tool)
    echo = room(invert_db(-7.5) * tool[1] + invert_db(-8.0) * touch[1] + invert_db(-6.5) * rub[1])
    return tool + tones + touch + rub + echo + air()


def band_limit(x):
    return signal.sosfilt(signal.butter(12, 16960, fs=SR, output="sos"), x)


def record(dry):
    # frequency in Hz, left-right difference in dB.
    ports = [(60, 5.5), (150, 5.5), (380, 0), (950, 0), (2380, -0.5), (5980, -0.5), (15000, -9.5)]
    # frequency in Hz, level in dB.
    capsule = [(20, -15.5), (45, 1), (80, -1.5), (15700, -2), (16000, -30), (17000, -45)]
    left = colour(dry[0], [(hz, db / 2) for hz, db in ports])
    right = colour(dry[1], [(hz, -db / 2) for hz, db in ports])
    return band_limit(colour(np.array([left, right]), capsule))


dry = scene()
out = record(dry)
pcm_store(out)
```